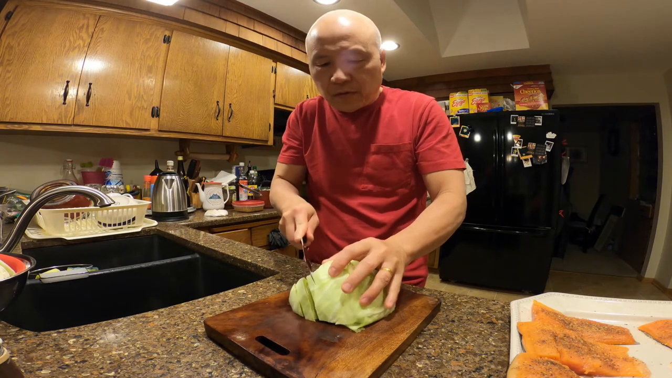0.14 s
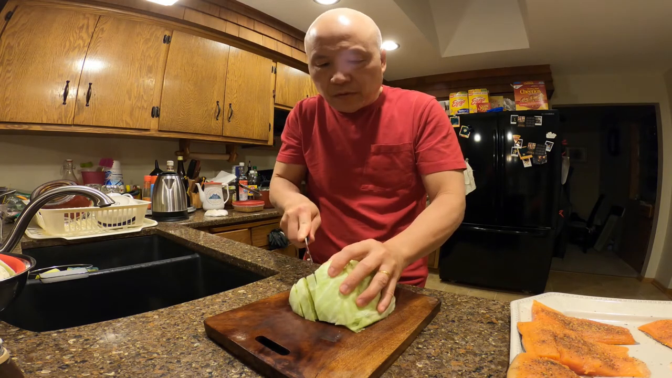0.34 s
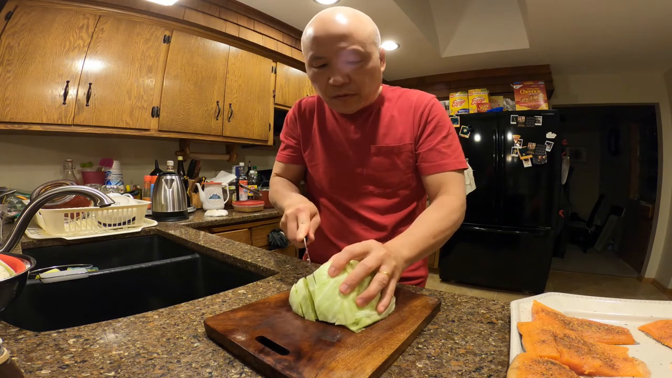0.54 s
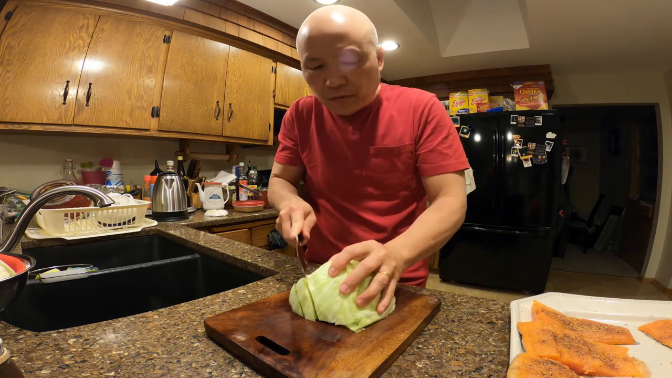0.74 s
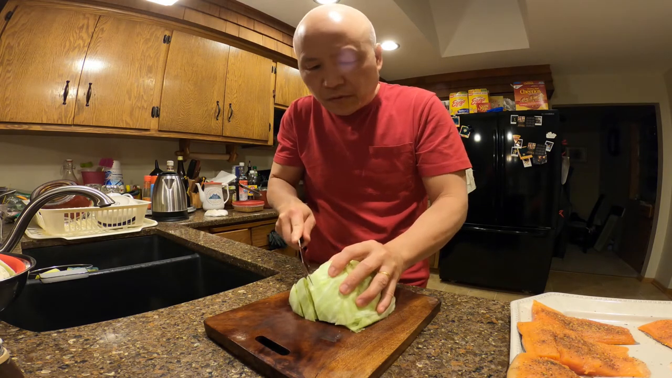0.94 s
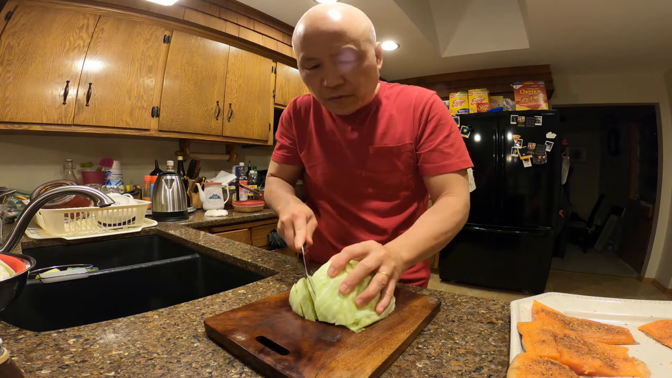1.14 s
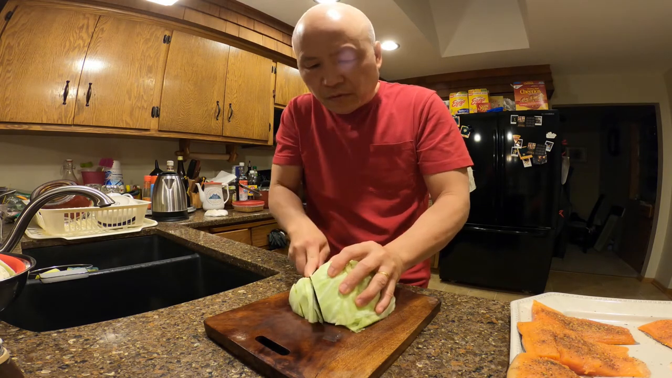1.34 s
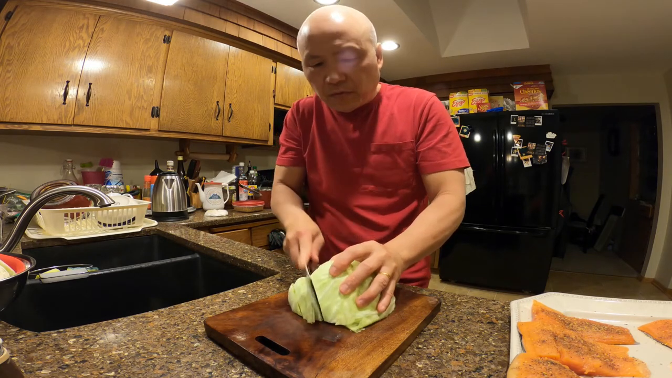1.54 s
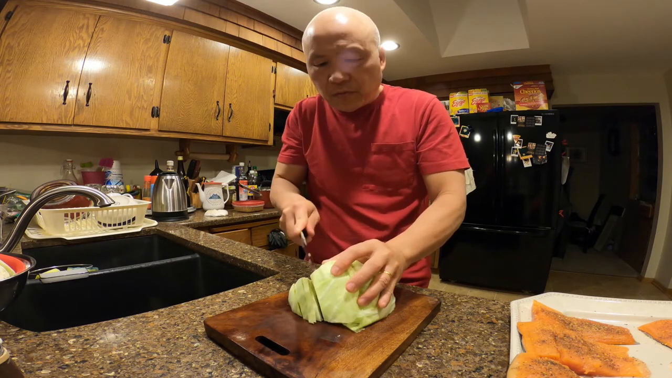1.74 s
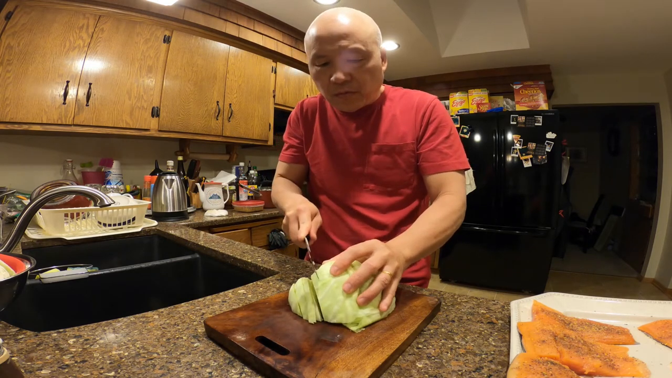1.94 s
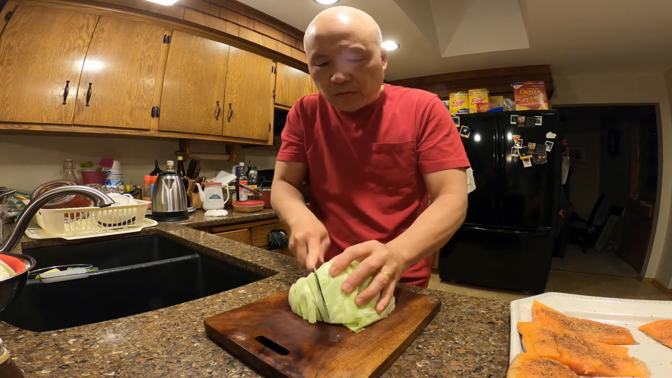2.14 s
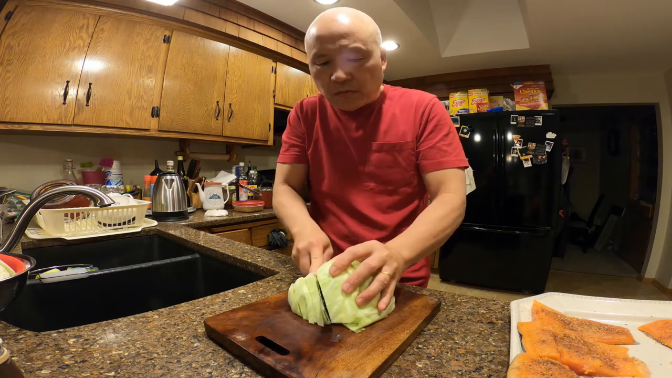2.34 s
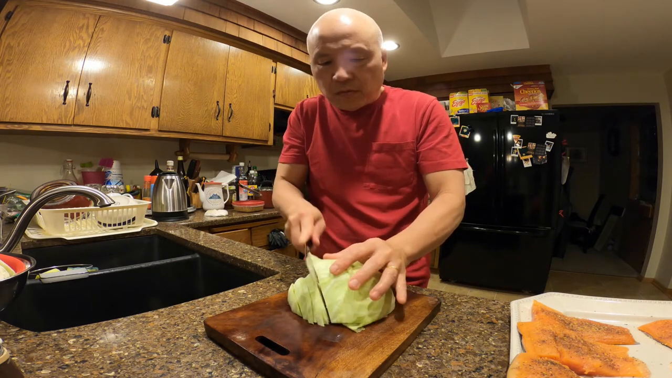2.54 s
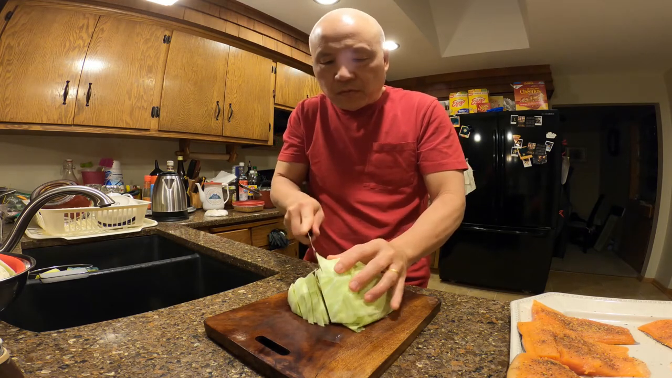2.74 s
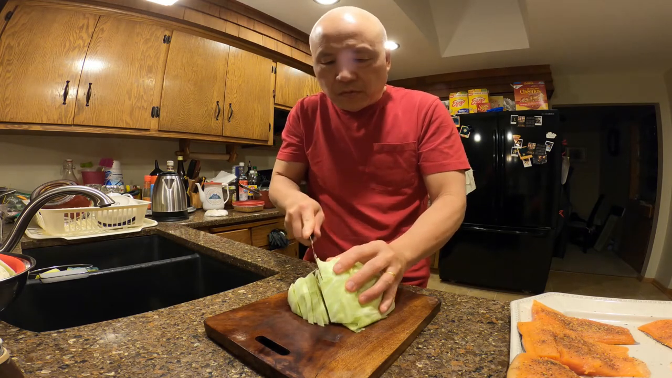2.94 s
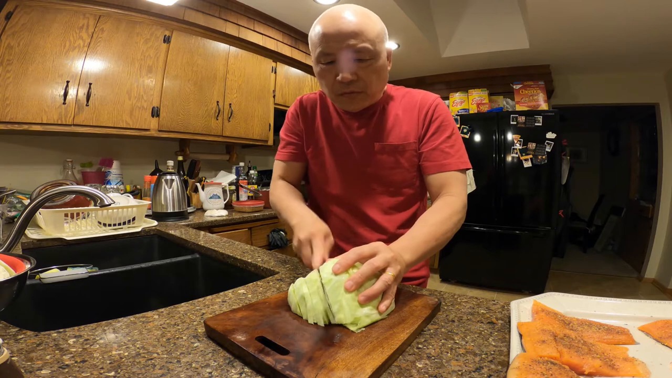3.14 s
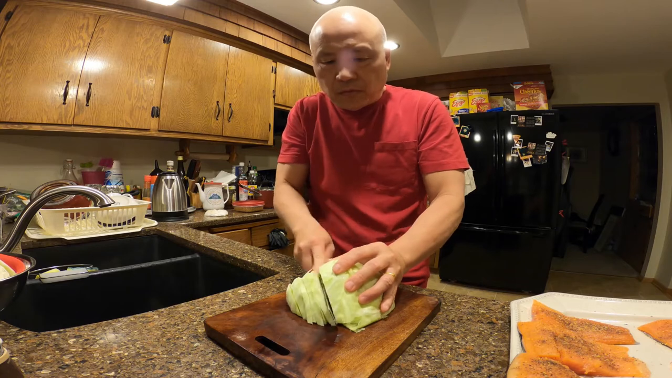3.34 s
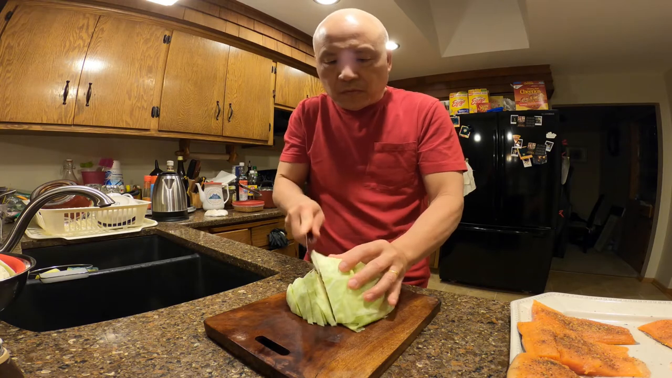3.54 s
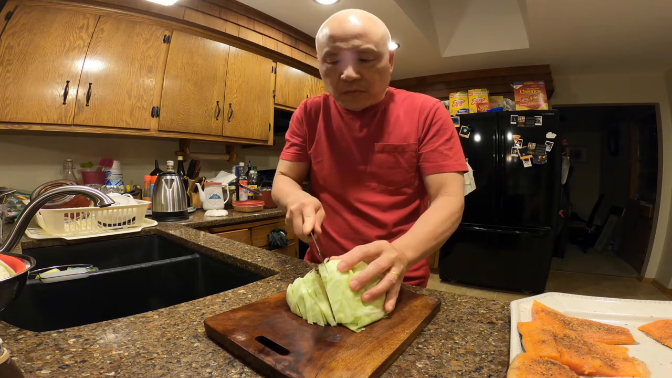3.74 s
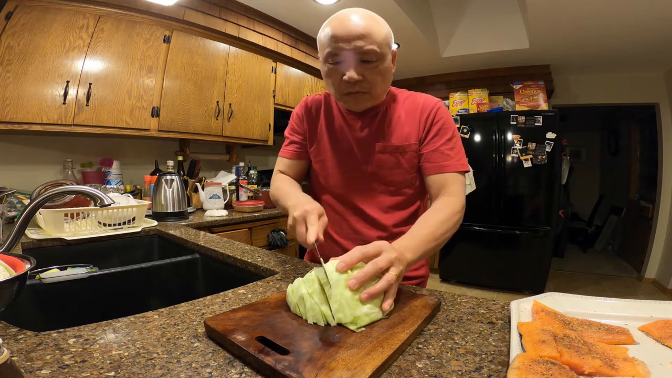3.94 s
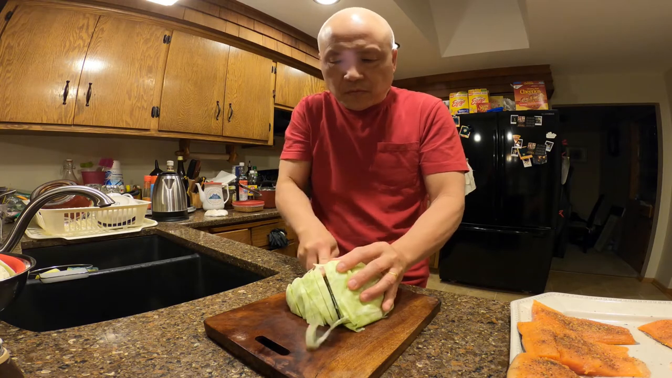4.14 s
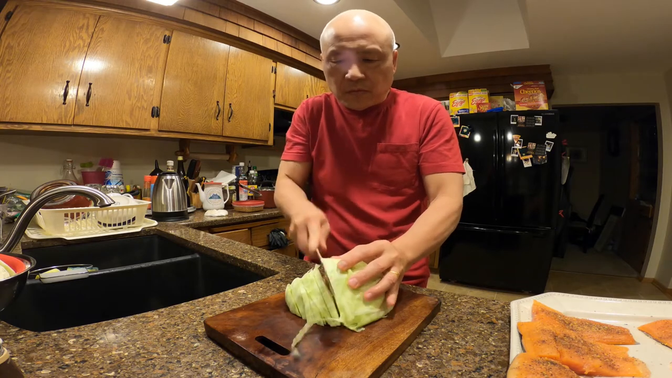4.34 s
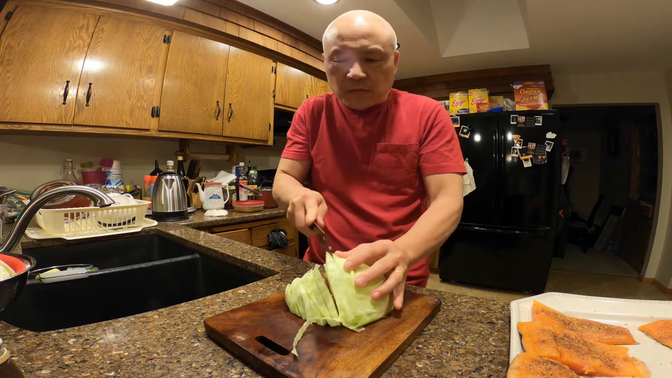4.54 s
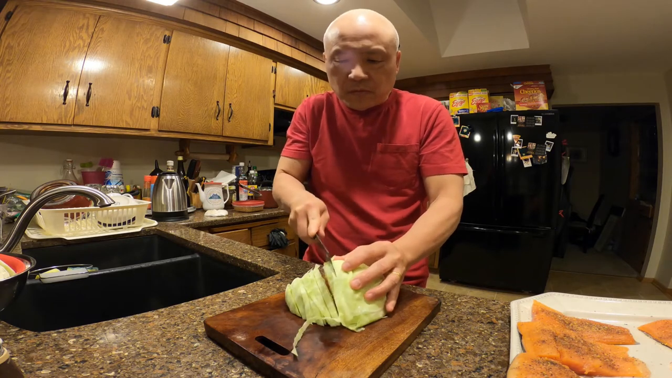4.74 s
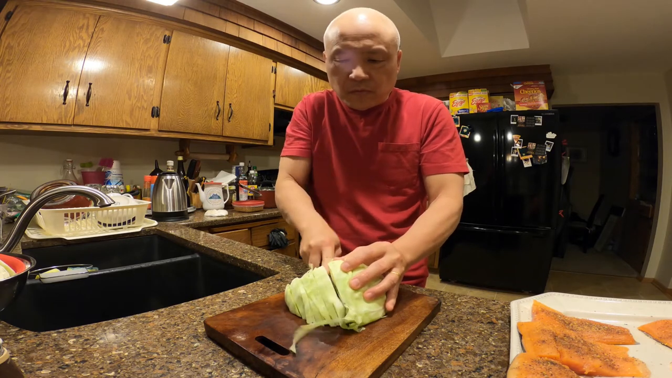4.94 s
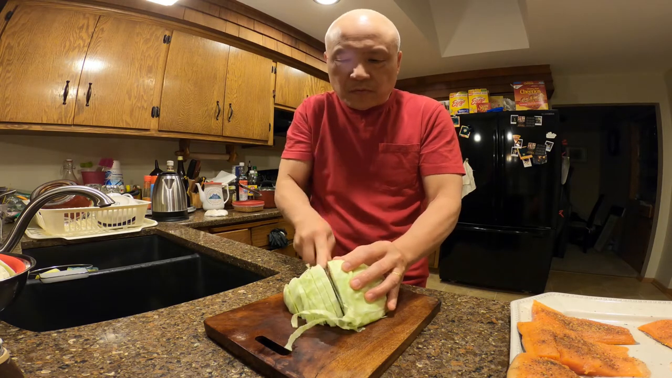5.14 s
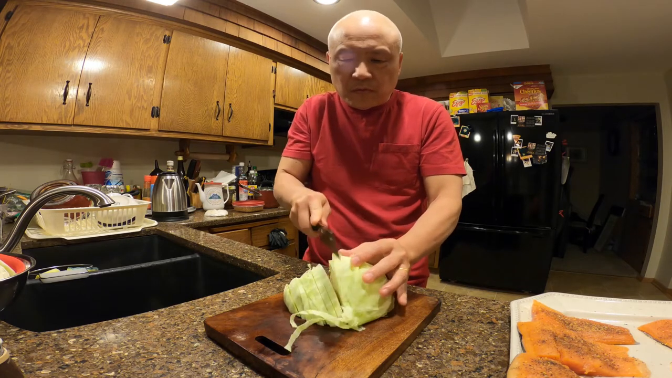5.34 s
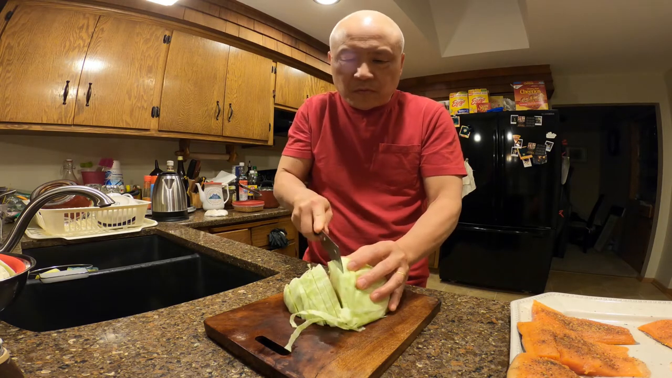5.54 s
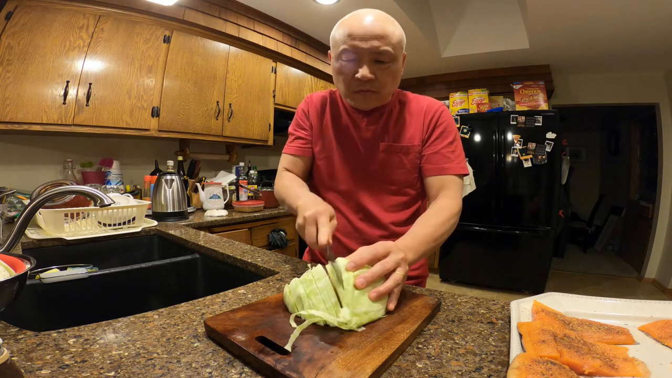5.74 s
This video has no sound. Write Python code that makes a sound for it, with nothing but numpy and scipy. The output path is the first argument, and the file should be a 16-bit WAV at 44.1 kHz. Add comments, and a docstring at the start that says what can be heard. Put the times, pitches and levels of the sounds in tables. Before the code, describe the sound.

Five crisp, tearing cuts through cabbage leaves end in woody chops, with leafy rustles and soft thumps between them in a hard-walled kitchen.

```python
"""In a hard-walled kitchen, close stereo microphones hear a knife shred a cabbage on a wooden board. Five times
the blade crunches down through the leaves, as coloured crackle, and chops the board, whose damped modes knock
and rebound while the stone counter booms and a steel basin rings. Between cuts leaves rustle as crackle and in
narrow bands of noise, snap as short rough notes, and the head is pressed on the board; decaying noise tails
answer as the room, over a faint hum and thin tone."""
import sys
import numpy as np
from scipy import signal
from scipy.fft import rfft, irfft, next_fast_len
from scipy.io import wavfile
from scipy.ndimage import uniform_filter1d, map_coordinates

SR = 44100
rng = np.random.default_rng(int(sys.argv[2]) if len(sys.argv) > 2 else 0)


def persist_wave(psi):
    """Save psi, clipped to +-1, as 16-bit WAV."""
    counts = np.round(np.clip(psi, -1, 1) * 32767).astype(np.int16)
    wavfile.write(sys.argv[1], SR, np.atleast_2d(counts).T)


N = 254456
TIME = np.arange(N) / SR


def amp(db):
    """Amplitude factor of a level in dB."""
    return 10 ** (np.asarray(db) / 20)


def unit(x):
    """Scale to an RMS of one."""
    return x / np.sqrt(np.mean(x ** 2) + 1e-20)


def along(points, hz):
    """Read a curve of (Hz, value) points on a log frequency axis."""
    f, v = np.transpose(points)
    return np.interp(np.log(hz + 1), np.log(f + 1), v)


def wobble(rate):
    """A smooth random curve with rate knots a second."""
    knots = rng.standard_normal(int(N * rate / SR) + 4)
    return map_coordinates(knots, [TIME * rate])


def ramp(seconds, levels_db):
    """A gain that runs through dB points, with rounded corners, and is silent outside them."""
    level_db = np.interp(TIME, seconds, levels_db, left=-200, right=-200)
    return np.abs(uniform_filter1d(amp(level_db), size=120)) + 1e-12


def filtered(x, response):
    """Multiply the spectrum of x by a complex response of frequency."""
    m = next_fast_len(N + SR // 2)
    return irfft(rfft(x, m) * response(np.fft.rfftfreq(m, 1 / SR)), m)[..., :N]


def mid_side_gains(likeness, hz):
    """Gains of two unrelated sounds whose sum and difference share the given left-right likeness."""
    turn = np.arccos(np.clip(along(likeness, hz), -1, 1)) / 2
    return np.array([np.cos(turn), np.sin(turn)])


def struck(force, modes):
    """A force rings a set of modes, each a sine that loses 60 dB in its own t60."""
    t = TIME[:SR // 2]
    ring = sum(amp(db - 60 * t / t60) * np.sin(2 * np.pi * hz * t) for hz, db, t60 in modes)
    return signal.fftconvolve(force, ring)[:N]


def crackle(count, cycles, spread_db, hiss_db):
    """Bursting cells: short damped grains from 600 Hz to 15 kHz, of uneven size, over hiss."""
    when, where, size = rng.random((count, 3)).T
    hz, t = (600 * 25 ** where)[:, None], TIME[:160]
    grain_gain = hz * amp(-spread_db * np.log(size + 0.0052))[:, None]
    grains = grain_gain * np.exp(-3 * t * hz / cycles) * np.sin(2 * np.pi * hz * t)
    at = (when * N).astype(int)[:, None] + np.arange(len(t))
    bursts = np.bincount(at.ravel(), grains.ravel())[:N]
    return unit(bursts) + amp(hiss_db) * rng.standard_normal(N)


def leafy(source, spectrum, dull_db):
    """Coloured crackle whose part under 1.6 kHz follows a moving gain."""
    sound = filtered(source, lambda hz: amp(along(spectrum, hz)))
    low = filtered(sound, lambda hz: 1 / (1 + (hz / 1600) ** 4))
    bright = sound - low
    return (bright + amp(dull_db) * low) / np.std(bright)


# Colour of the idle kitchen. Each row: frequency in Hz, relative level in dB.
HUSH_SPECTRUM = [(12, -65.5), (20, -19.5), (64, -8), (126, -11.5), (252, -8), (282, -11.5), (373, -10.5),
                 (616, -25), (669, -21.5), (813, -29), (1170, -24.5), (2480, -36), (9440, -46),
                 (15600, -56.5)]
# How alike the idle kitchen is at both microphones. Each row: frequency in Hz, left-right likeness from 0 to 1.
HUSH_LIKENESS = [(60, 0.28), (240, 0.1), (950, 0.084), (3770, 0.17), (15000, 0.11)]
HUSH_DB = -64
WHINE_HZ, WHINE_DB = 9195, -96


def hush():
    """Appliance rumble and air as coloured stereo noise, with a thin electric tone as a wavering sine."""
    def colour(hz):
        return amp(along(HUSH_SPECTRUM, hz)) * mid_side_gains(HUSH_LIKENESS, hz)
    mid, side = filtered(rng.standard_normal((2, N)), colour)
    air = unit(np.array([mid + side, mid - side]))
    tone = amp(WHINE_DB + 2.6 * wobble(6.5)) * np.sin(2 * np.pi * WHINE_HZ * TIME)
    return amp(HUSH_DB + 0.85 * wobble(9.2)) * air + tone


# Leaves moving under hand and blade. Each row: start in seconds, swell in seconds, peak level in dB,
# fade by 60 dB in seconds, gain of the part under 1.6 kHz in dB.
RUSTLES = [(0, 0.01, -57.5, 0.15, -4), (.27, .024, -72.5, 0.31, -2), (.55, 0.017, -71, .5, -8),
           (.7, 0.016, -77, 0.15, 3), (.965, 0.024, -64.5, .12, -19), (1.08, .01, -75.5, .5, -4),
           (1.192, 0.0087, -59, 0.083, -11), (1.643, 0.0058, -53.5, .27, 6),
           (1.72, 0.0066, -56.5, .42, -19), (1.996, .01, -66, .22, -14), (2.115, 0.0091, -62.5, .05, -1),
           (2.478, .06, -58.5, 0.55, -12.5), (2.594, .008, -53.5, 0.057, -0.5),
           (2.61, .075, -56, 0.091, -1), (2.92, 0.0049, -73, .1, -14), (2.938, 0.0026, -59, 0.18, -1),
           (3.469, 0.013, -49, 0.077, 7), (3.49, 0.046, -57, 0.6, 2), (3.58, .12, -55, 0.17, 1),
           (3.898, 0.0052, -68.5, .25, -20), (4.017, 0.0055, -46, .04, 3.5), (4.359, 0.017, -61.5, 0.76, 3),
           (4.47, 0.012, -59, 0.22, -24), (4.553, 0.0085, -55.5, 0.097, -10), (4.777, .005, -57, .22, -9),
           (4.878, 0.0061, -49.5, .06, -5), (5.309, .035, -55, 0.32, -1),
           (5.428, 0.0097, -62.5, 0.057, 5.5), (5.57, 0.022, -75.5, .4, -8),
           (5.63, 0.00706, -58.5, 0.28, -6)]
# Colour of leaves rubbing. Each row: frequency in Hz, relative level in dB.
LEAF_SPECTRUM = [(290, -23.5), (500, -8), (859, -7), (1630, -6), (1830, -8), (2430, -8.5), (3510, -7.5),
                 (9120, -20.5), (15000, -41)]
SWELL_DB = -15  # where a rustle starts, under its peak


def rustling():
    """Loose leaves rub in sparse clumps of crackle: each rustle swells, then fades."""
    level, low = np.zeros((2, N))
    for s, swell_s, db, t60, dull_db in RUSTLES:
        shape = amp(db) * ramp(s + np.cumsum([0, swell_s, t60]), [SWELL_DB, 0, -60])
        level += shape
        low += amp(dull_db) * shape
    dull_db = 20 * np.log10(low / level)  # the louder of overlapping rustles weighs more
    source = crackle(count=15000, cycles=8.4, spread_db=4, hiss_db=-4.0)
    return level * amp(0.49 * wobble(35)) * leafy(source, LEAF_SPECTRUM, dull_db)


# Single leaves snapping. Each row: start in seconds, level in dB, pitch in Hz, gain of the tick in dB.
SNAPS = [(0.017, -51.5, 4050, -4), (0.0427, -50, 1950, -17.5), (0.1411, -61, 1830, -1),
         (0.2927, -59, 4090, -9), (0.3127, -58, 4100, -11), (0.5606, -53, 3550, 13.5),
         (0.605, -56, 2680, -0.5), (0.7086, -62, 3150, 8), (0.9386, -54.5, 1580, -2),
         (1.1155, -58, 2840, -8.5), (1.2002, -50, 2970, 10), (1.2396, -27.5, 3400, -2.5),
         (1.2623, -25.5, 3920, -1.5), (1.2854, -18, 2820, -8.5), (1.297, -21, 3420, -11),
         (1.3101, -24.5, 1740, -11), (1.4986, -34, 2400, -6.5), (1.564, -54.5, 2300, -15),
         (1.6482, -40.5, 4230, -21), (1.727, -38.5, 3300, -15), (1.7972, -46.5, 2050, -11.5),
         (1.824, -42, 3610, -21), (1.8886, -55.5, 4100, -11), (2.0078, -45, 2990, -3.5),
         (2.1214, -39, 4080, -4), (2.155, -32.5, 3920, -12), (2.1824, -23.5, 3510, -7),
         (2.21, -14.5, 3380, -13), (2.511, -41, 1540, -10.5), (2.5204, -49.5, 1600, -21),
         (2.5616, -43.5, 1830, -17), (2.6022, -35.5, 2930, -19), (2.6666, -43, 3400, -10.5),
         (2.6843, -39, 4440, -18.5), (2.9227, -55.5, 3480, -8.5), (2.9442, -46.5, 4050, -7.5),
         (3.1382, -23, 2840, -8), (3.188, -22, 3410, -16.5), (3.2384, -19.5, 3470, -14),
         (3.4785, -38, 1840, -16.5), (3.5803, -44.5, 1800, -12.5), (3.5991, -36, 1570, -16),
         (3.707, -39.5, 1520, -15.5), (3.8142, -59.5, 1510, -15.5), (3.91, -50.5, 4370, -4.5),
         (4.021, -40, 1900, 1), (4.0513, -28.5, 1900, -4), (4.0849, -20.5, 1530, -12),
         (4.3514, -38, 2340, -11.5), (4.3653, -39.5, 1940, -17), (4.4314, -38.5, 2190, -15),
         (4.4774, -45.5, 2700, 2), (4.526, -52.5, 1880, -8.5), (4.5666, -54, 3390, -14),
         (4.6103, -48, 1710, -16), (4.7825, -43.5, 3380, 4), (4.8209, -50, 1510, -9),
         (4.8904, -41, 3490, -3.5), (4.8988, -40.5, 3360, -7), (4.924, -23.5, 2700, -9),
         (4.9357, -20, 3240, -9.5), (5.0365, -18.5, 2950, -12), (5.3164, -43.5, 2290, -19.5),
         (5.3353, -48, 3570, -14.5), (5.438, -49, 2900, -25), (5.5917, -59.5, 4650, 4),
         (5.6376, -42.5, 1530, -1)]
SNAP_T60_S = 0.012
BODY_DB, BODY_FALLS_DB = 6.5, 6  # gain of the body's noise at 2 kHz pitch; less per octave of pitch


def snaps():
    """A broad tick, a rough note at the leaf's pitch and a duller body, fuller in the lower snaps."""
    out, t = np.zeros(N + SR), TIME[:1800]
    fade = amp(-60 * t / SNAP_T60_S) * (1 - np.exp(-t / 0.00036))
    for s, db, hz, tick_db in SNAPS:
        tick, flap, rough = rng.standard_normal((3, len(t)))
        note = np.sin(2 * np.pi * hz * t + 3 * uniform_filter1d(rough, size=24))
        crisp = amp(tick_db) * np.diff(uniform_filter1d(tick, size=3), prepend=0)
        body_gain = amp(BODY_DB - BODY_FALLS_DB * np.log2(hz / 2000))
        body = body_gain * uniform_filter1d(flap, size=16)
        out[round(s * SR):][:len(t)] += amp(db) * fade * (note + crisp + body)
    return out[:N]


# The head pressed or shifted on the board. Each row: start in seconds, level of the force in dB.
THUMPS = [(0.815, -57), (0.956, -53.5), (1.654, -47.5), (2.021, -53.5), (2.598, -52.5), (2.786, -53.5),
          (2.952, -41.5), (3.599, -50), (3.916, -47), (4.56, -48), (4.787, -44.5), (5.399, -53.5),
          (5.65, -40.5)]
# Modes of the stone counter. Each row: frequency in Hz, level in dB, decay by 60 dB in seconds.
COUNTER_MODES = [(66.2, -3, 0.43), (84, 8, 0.11), (137.4, 10.5, 0.2), (199.7, 1, 0.39), (273.1, -7, 0.58),
                 (308, -7.5, 0.38)]
PRESS_S, PRESS_ROUGH = 0.016, 0.6  # when the dragging of a push is strongest, and its share of the push


def thumps():
    """Soft slow pushes, a jolt and a rough drag, ring only the counter's low modes."""
    force, t = np.zeros(N + SR), TIME[:6000]
    jolt = t * np.exp(-t / 0.0045)
    for s, db in THUMPS:
        rough = unit(uniform_filter1d(rng.standard_normal(len(t)), size=90))
        drag = PRESS_ROUGH * rough * t / PRESS_S * np.exp(1 - t / PRESS_S)
        force[round(s * SR):][:len(t)] += amp(db) * (jolt + jolt.max() * drag) / jolt.sum()
    return struck(force[:N], COUNTER_MODES)


# Leaves rustling in a narrow band. Each row: start in seconds, level in dB, upper edge of the band in Hz, #
# decay by 60 dB in seconds.
SCRAPES = [(0.976, -71, 2900, 0.11), (1.724, -50.5, 3530, 0.17), (2.007, -66, 2940, 0.12)]
NARROW_BAND = 0.85  # lower edge of the band over its upper edge


def scrapes():
    """Leaves rustle in a narrow band: rough noise that dies away."""
    out, t = np.zeros(N + SR), TIME[:SR // 4]
    for s, db, hz, t60 in SCRAPES:
        band = signal.butter(2, [hz * NARROW_BAND, hz], "band", fs=SR, output="sos")
        band_noise = unit(signal.sosfilt(band, rng.standard_normal(len(t))))
        out[round(s * SR):][:len(t)] += amp(db - 60 * t / t60) * band_noise
    return out[:N]


# Strokes through the head, each ended by the next chop. Each row: blade bites in seconds, time to full crunch
# in seconds, crunch level in dB, change by the board in dB, push on the board in dB.
STROKES = [(1.239, 0.065, -33, -2, -29.5), (2.148, 0.054, -31.5, -5.5, -31),
           (3.129, .008, -36.5, -1.5, -31.5), (4.047, 0.026, -35, -2, -35), (4.899, .04, -33, -3.5, -31.5)]
# Colour of the crunch. Each row: frequency in Hz, relative level in dB.
CRUNCH_SPECTRUM = [(180, -36), (300, -15.5), (384, 3), (518, -7), (697, 2.5), (1200, -2), (1520, -1.5),
                   (2530, -5.5), (3520, -2.5), (12000, -22), (15600, -40)]
# Gain of the crunch under 1.6 kHz, in dB, at touch, bite, full crunch and board.
CRUNCH_DULL_DB = [-7.5, -6.5, -6, 0.5]
TOUCH_S, TOUCH_DB, BITE_DB = 0.012, -34, -13  # first touch before the bite; levels under full crunch
PUSH_PEAK, PUSH_START_DB, PUSH_END_DB = 0.37, -18, -11.5  # share of the stroke at the peak; levels under it


def cutting():
    """The blade bites, builds to full crunch and sags as the head thins; its uneven push shakes the counter."""
    crunch, push, dull_db = np.zeros((3, N))
    for s, rise_s, crunch_db, sag_db, push_db in STROKES:
        board_s = min(chop[0] for chop in CHOPS if chop[0] > s)
        moments = [s - TOUCH_S, s, s + rise_s, board_s]
        crunch += amp(crunch_db) * ramp(moments, [TOUCH_DB, BITE_DB, 0, sag_db])
        dull_db += np.interp(TIME, moments, CRUNCH_DULL_DB, left=0, right=0)
        push_moments = s + (board_s - s) * np.array([0, PUSH_PEAK, 1])
        push += amp(push_db) * ramp(push_moments, [PUSH_START_DB, 0, PUSH_END_DB])
    layers = wobble(28) + 0.68 * wobble(90)  # leaf layers make crunch and push uneven together
    source = crackle(count=22000, cycles=4.6, spread_db=2.5, hiss_db=1.5)
    tearing = leafy(source, CRUNCH_SPECTRUM, dull_db)
    shake = unit(struck(rng.standard_normal(N) * amp(2.5 * layers), COUNTER_MODES))
    return crunch * amp(2.05 * layers) * tearing + push * shake


# Blade meeting the board, and rebounds. Each row: start in seconds, knock in dB, hardness in dB per octave
# above 1 kHz, counter boom in dB, basin ring in dB.
CHOPS = [(1.435, -23, 0, -47, -78), (2.348, -21.5, 3, -36.5, -69.5), (2.379, -23, -14.5, -37, -69),
         (3.332, -20.5, 6.5, -47, -59), (3.364, -30.5, 4.5, -34, -65), (3.399, -30.5, 1, -56.5, -79),
         (4.227, -19.5, 5.5, -31, -58.5), (4.262, -27, -8, -31.5, -68), (4.297, -31, -5, -50.5, -67.5),
         (5.078, -20, 7, -33, -55), (5.097, -36, -4.5, -50, -70), (5.143, -29.5, 3.5, -63.5, -55.5)]
# Modes of the wooden board. Each row: frequency in Hz, level in dB.
BOARD_MODES = [(283, -8), (380, -4.5), (590, -0.5), (760, -0.5), (890, 4), (1100, 2.5), (1360, -1),
               (1760, -3), (2170, -5), (2440, -3), (2770, -1), (4370, -9), (5730, -10)]
# Close, beating modes of a steel basin nearby. Each row: frequency in Hz, level in dB, decay by 60 dB in seconds.
BASIN_MODES = [(996, -5.5, 0.15), (1060, -1, 0.18), (1098, -2.5, 0.29), (1153, -1.5, 0.28), (1210, -5, 0.2)]
WOOD_CYCLES = 26  # cycles in which a board mode loses 60 dB
IN_STEP_HZ = 1000  # board modes below this start together
CONTACT_HZ = 3580  # wood yields: little force above this
CONTACT_S, CONTACT_GROWS = 0.0059, 0.55  # contact time of a -19 dB knock; dB longer per dB harder
CRACK_DB, CRACK_GROWS, CRACK_S = -17.5, 2.5, 0.0058  # crack at a -19 dB knock, dB per dB harder, t60 in s
BASIN_FLUTTER_DB = 3.5  # the basin's ring wavers


def board_ring(hard_db, t):
    """Board modes die within equal cycles; neighbouring upper modes start in opposite directions."""
    ring = np.zeros(len(t))
    for k, (hz, level) in enumerate(BOARD_MODES):
        harder_db = hard_db * max(np.log2(hz / 1000), 0)
        level_db = level + harder_db + rng.normal(0, 1.6) - 60 * t * hz / WOOD_CYCLES
        direction = (-1) ** (k * (hz > IN_STEP_HZ))
        ring += amp(level_db) * direction * np.sin(2 * np.pi * hz * t)
    return ring


def chops():
    """The edge rolls onto the wood in a few ms; returns the near sound and the plainer blow for the room."""
    near, far, crack, boom, basin = np.zeros((5, N + SR))
    t = TIME[:2600]
    for s, db, hard_db, boom_db, basin_db in CHOPS:
        contact_s = CONTACT_S * amp(CONTACT_GROWS * (db + 19))
        roll = 0.13 * rng.standard_normal(len(t)) * np.exp(-(t / contact_s) ** 2)
        roll[20:40] -= 0.055 * np.hanning(20)  # the heel lands softly
        roll[80] = -0.72  # then the belly of the blade, hard
        ring = board_ring(hard_db, t)
        at = round(s * SR)
        near[at:][:len(t)] += amp(db) * np.convolve(roll, ring)[:len(t)]
        far[at:][:len(t)] += amp(db) * np.linalg.norm(roll) * ring
        crack_db = CRACK_DB + CRACK_GROWS * (db + 19) - 60 * t / CRACK_S
        crack[at + 80:][:len(t)] += amp(crack_db) * rng.standard_normal(len(t))
        boom[at + 40] = amp(boom_db)
        basin[at:][:len(t)] += amp(basin_db) * rng.standard_normal(len(t)) * np.exp(-t / 0.024)
    yielding = signal.butter(4, CONTACT_HZ, fs=SR, output="sos")
    knock, blow = signal.sosfilt(yielding, np.array([near, far])[:, :N])
    crack_band = signal.butter(3, [2500, 6000], "band", fs=SR, output="sos")
    bright = signal.sosfilt(crack_band, crack[:N])
    below = struck(boom[:N], COUNTER_MODES)
    basin_ring = amp(BASIN_FLUTTER_DB * wobble(70)) * struck(basin[:N], BASIN_MODES)
    return knock + bright + below + basin_ring, blow + below


# Decay of the kitchen. Each row: frequency in Hz, decay by 60 dB in seconds.
KITCHEN_DECAY = [(100, 0.47), (400, 0.21), (850, 0.27), (1100, 0.4), (1400, 0.41), (3000, 0.36),
                 (6000, 0.36), (14000, 0.56)]
# The walls keep less treble. Each row: frequency in Hz, gain in dB.
WALL_GAIN = [(100, -0.5), (3000, -2.5), (6000, -2), (9000, -4), (14000, -6.5)]


def kitchen(x, alike):
    """Noise tails die at a speed per frequency, partly shared by both microphones; new every third of a second."""
    out, hop = np.zeros((2, N + 2 * SR)), SR // 3
    for start in range(0, N, hop):
        hz, t, z = signal.stft(rng.standard_normal((2, SR * 3 // 5)), SR, nperseg=256)
        share = np.clip(alike / (1 + (hz[:, None] / 6500) ** 2), 0, 1)
        z[1] = share * z[0] + np.sqrt(1 - share ** 2) * z[1]
        decay_db = along(WALL_GAIN, hz)[:, None] - 60 * t / along(KITCHEN_DECAY, hz)[:, None]
        tail = signal.istft(z * amp(decay_db), SR, nperseg=256)[1]
        wet = signal.fftconvolve(x[None, start:start + hop], tail / np.linalg.norm(tail[0]), axes=1)
        at = start + 200  # the room answers 4.5 ms late
        out[:, at:at + wet.shape[1]] += wet
    return out[:, :N]


# How alike the near sound is at both microphones. Each row: frequency in Hz, left-right likeness from 0 to 1.
NEAR_LIKENESS = [(60, 1), (2000, 0.97), (4000, 0.96), (8000, 0.74), (14000, 0.63)]
# Balance of the microphones. Each row: frequency in Hz, left minus right in dB.
LEFT_BALANCE = [(60, 0.5), (110, 6), (200, -5), (380, 0.5), (700, 1.5), (1290, 1), (2380, 3.5), (4400, 2),
                (8120, 1.5), (15000, -10)]
# Phase between the microphones. Each row: frequency in Hz, lead of the left in radians.
LEFT_LEAD = [(60, 0), (800, -.1), (3000, -.6), (6100, -.95), (8200, -2.4), (9300, -2.3), (15000, -1.6)]
# Response of the microphones. Each row: frequency in Hz, gain in dB.
MIC_RESPONSE = [(20, -22), (40, -14.5), (55, -4), (7000, -0.5), (8200, -4.5), (9200, 0), (12500, -5),
                (15000, -7.5)]


def microphones(near, room):
    """Two close ports differ in level and phase; part of the treble arrives by unrelated, shifting paths."""
    z = signal.stft(near, nperseg=128)[2]
    random_phase = np.exp(2j * np.pi * rng.random(z.shape))
    scattered = signal.istft(z * random_phase, nperseg=128)[1][:N] * 3.1
    mid, side = filtered(np.array([near, scattered]), lambda hz: mid_side_gains(NEAR_LIKENESS, hz))

    def response(hz):
        half = amp(along(LEFT_BALANCE, hz) / 2) * np.exp(0.5j * along(LEFT_LEAD, hz))
        return amp(along(MIC_RESPONSE, hz)) * np.array([half, 1 / half])
    return filtered(np.array([mid + side, mid - side]) + room, response)


def scene():
    """Cabbage, blade and board close to the microphones, the kitchen around them and the hush beneath."""
    cabbage = rustling() + snaps() + scrapes() + cutting()
    knock, blow = chops()
    room = kitchen(amp(-10.5) * cabbage + amp(-6.0) * blow, alike=0.79)
    return microphones(cabbage + knock + thumps(), room) + hush()


TOP_HZ = 15750


def record(dry):
    """The recorder keeps nothing above its band limit."""
    return filtered(dry, lambda hz: hz < TOP_HZ)


dry = scene()
out = record(dry)
persist_wave(out)
```